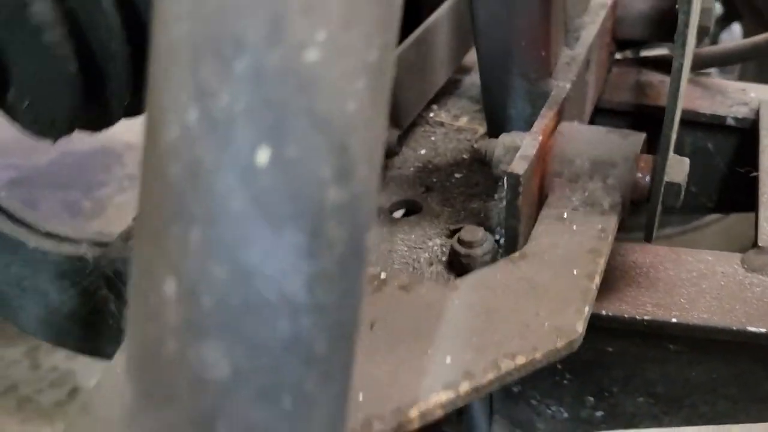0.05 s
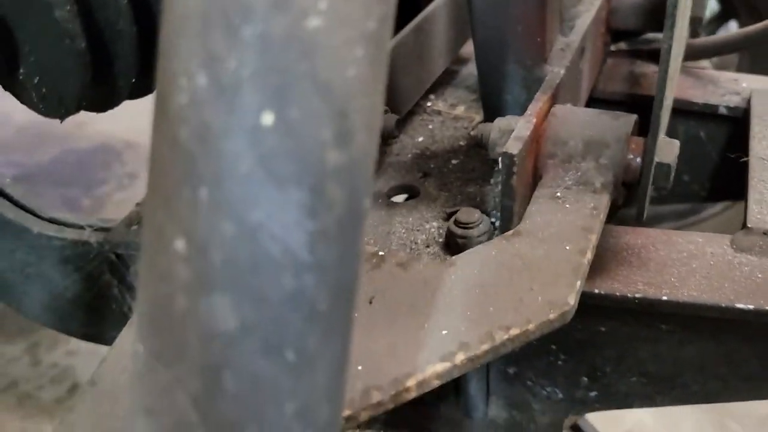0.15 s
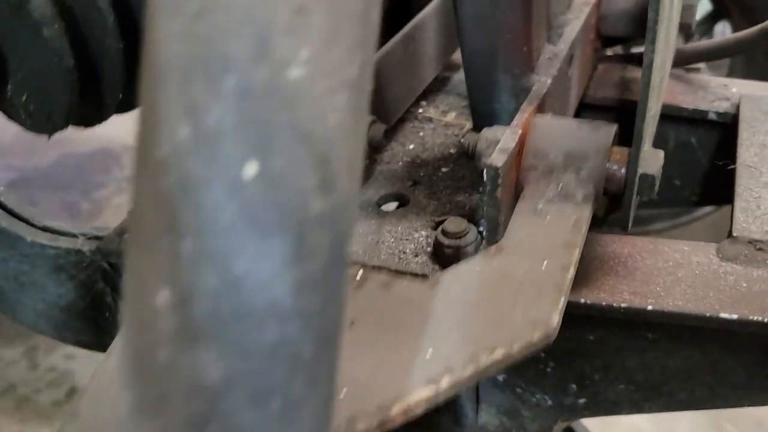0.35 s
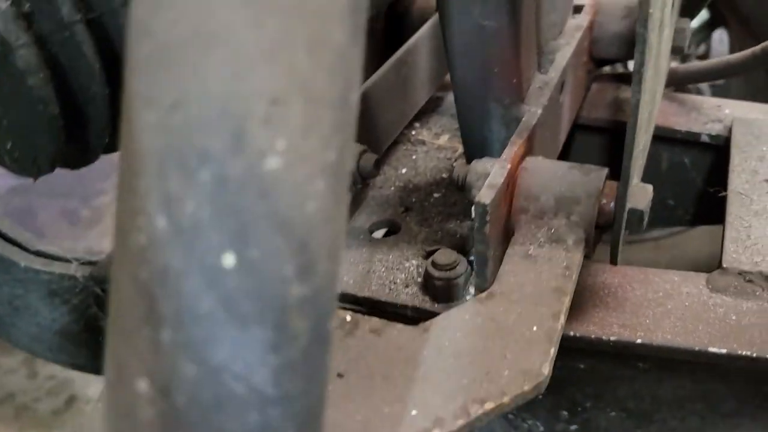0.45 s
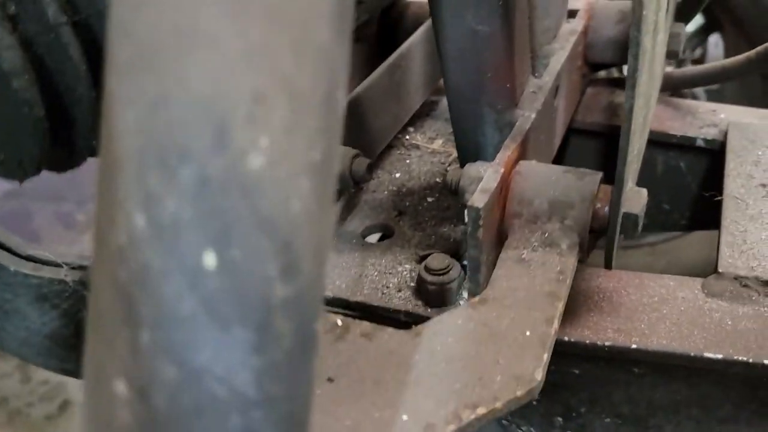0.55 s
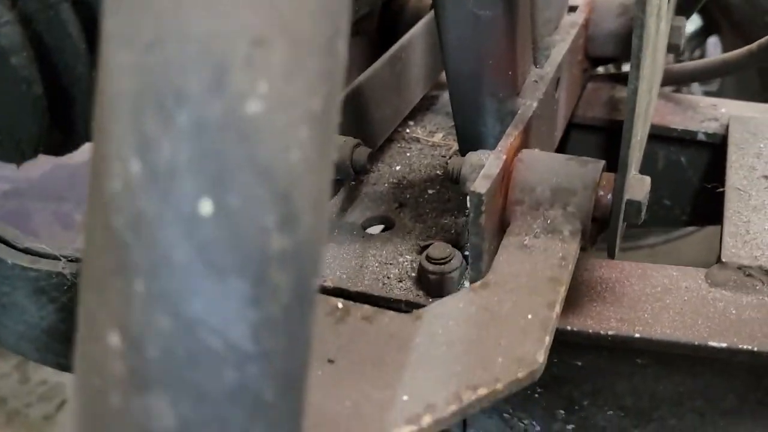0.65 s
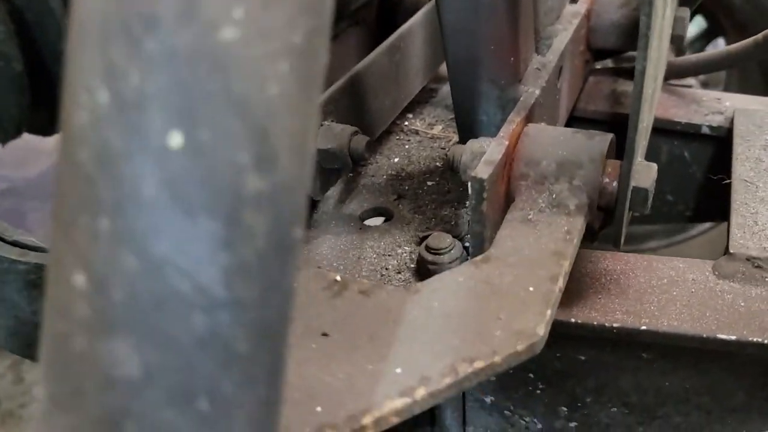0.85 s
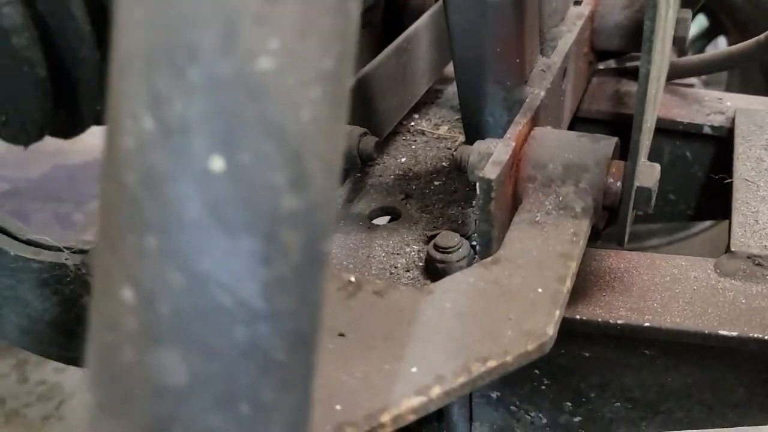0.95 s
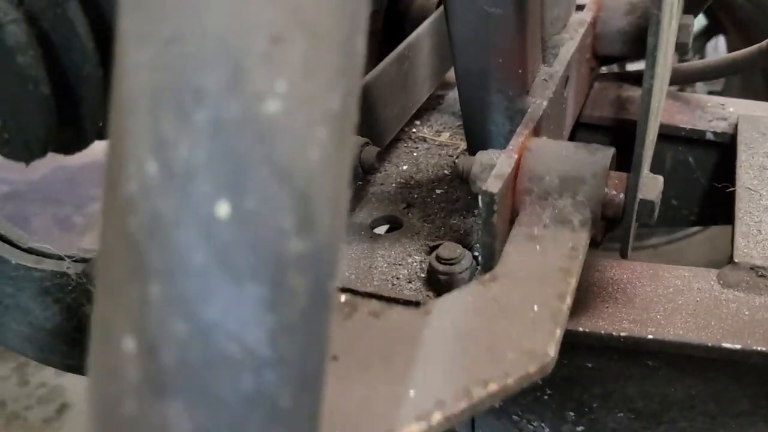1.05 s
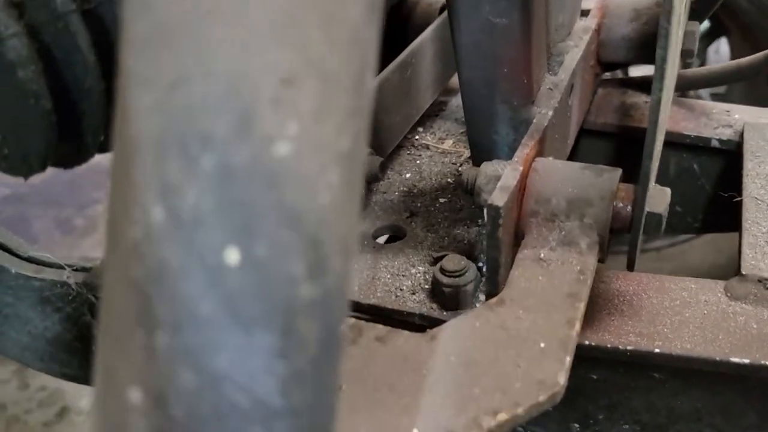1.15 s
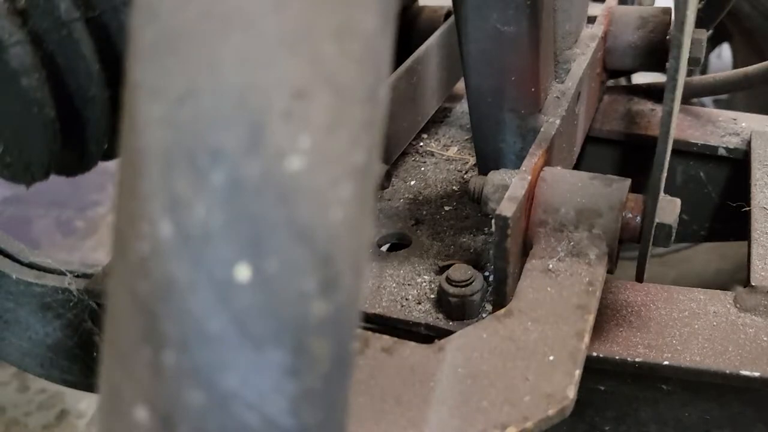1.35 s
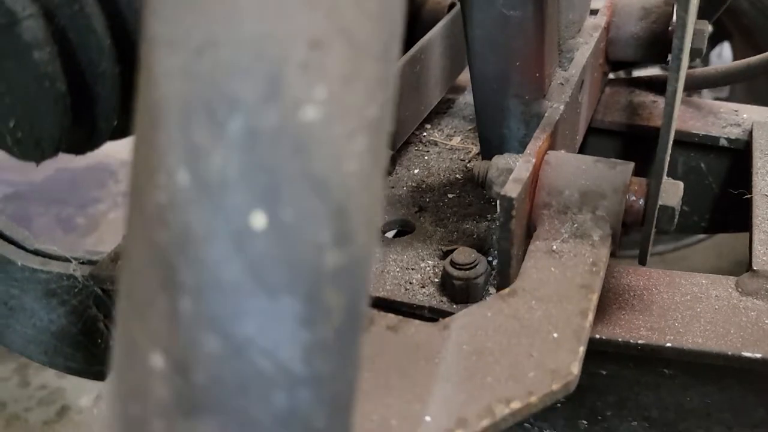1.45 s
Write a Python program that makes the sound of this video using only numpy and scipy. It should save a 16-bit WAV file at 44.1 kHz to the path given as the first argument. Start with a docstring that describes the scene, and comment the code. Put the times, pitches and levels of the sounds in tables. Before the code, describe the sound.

A steel suspension arm knocks in worn mounts, close up in a workshop. Several sharp, briefly ringing clanks come unevenly, each trailed by smaller rattles and dull thuds, with faint gritty scrapes and a low rumble beneath.

```python
"""A steel suspension arm knocks in its worn mounts, rocked by hand, close up in a workshop.
The bolt hits either side of its play, ringing the arm and setting the frame clattering; the arm
thuds into the rubber and chatters to rest. Between knocks the bolt slides with a gritty scrape
and a loose washer taps lightly. The room answers over a low rumble."""
import sys
import numpy as np
from scipy import signal
from scipy.fft import rfft, irfft, next_fast_len
from scipy.io import wavfile
from scipy.ndimage import uniform_filter1d, minimum_filter1d

SR = 44100
rng = np.random.default_rng(int(sys.argv[2]) if len(sys.argv) > 2 else 0)


def digitize_waveform(pressure):
    """Quantize a signal to 16-bit integers and store it at the path in sys.argv[1].

    Rows of a 2-D input are taken as channels; values are limited to [-1, 1].
    """
    field = np.atleast_2d(pressure).T
    bounded = np.clip(field, -1, 1)
    quanta = np.round(bounded * 32767).astype(np.int16)
    wavfile.write(sys.argv[1], SR, quanta)


N = 66150
LEAD_S = 0.1  # pre-roll, so the scene opens on a knock already ringing

# The five EQ points that shape each knock's clatter, in Hz.
CLATTER_HZ = [380, 950, 2100, 4500, 12000]
# The bolt's hits. Each row: start in seconds, contact (0 lift stop, 1 drop stop, 2 bracket edge,
# 3 sleeve), ring level in dB, then clatter gain in dB at each of the five EQ points.
KNOCKS = [(-.05, 1, -18.5, -22.5, -18.5, -16.5, -16, -32.5), (.082, 2, -65, -30, -62, -33, -44, -56),
          (.169, 2, -55, -54, -49, -47, -58, -65), (0.2186, 0, -13, -19, -14.5, -16.5, -13, -30.5),
          (.291, 3, -29.5, -25, -33, -33, -31, -41), (.3085, 2, -16.5, -25, -22, -18.5, -16, -17),
          (.321, 1, -28.5, -21, -22, -22.5, -27, -66), (.366, 3, -19.5, -24, -26, -27, -24.5, -30),
          (0.42, 3, -31.5, -35.5, -31.5, -31.5, -27.5, -85), (.456, 1, -39.5, -34.5, -57, -31, -35, -53),
          (.486, 3, -33, -69, -41, -36, -48, -78), (0.621, 2, -46.5, -42.5, -30.5, -39, -44, -49.5),
          (0.662, 2, -57.5, -53, -59, -65, -49, -55), (0.713, 1, -13.5, -30.5, -16.5, -15.5, -12.5, -31),
          (0.7697, 2, -34, -33.5, -29, -26.5, -24, -29), (.808, 3, -20.5, -29.5, -28, -17, -43, -51),
          (0.9847, 0, -14, -25, -15.5, -19.5, -15, -29.5),
          (1.0947, 1, -25.5, -24.5, -20.5, -25.5, -20.5, -36.5),
          (1.138, 0, -49, -26.5, -28, -48, -62, -42.5), (1.1559, 3, -20, -33, -26.5, -23, -37, -35.5),
          (1.185, 3, -30.5, -47, -34, -23, -32.5, -48), (1.201, 2, -33.5, -29, -48, -38, -31.5, -44),
          (1.248, 2, -54.5, -55, -68, -42.5, -39, -65), (1.273, 2, -64.5, -39.5, -62, -63, -39.5, -58.5)]


def bolt_knocks(out, t):
    """Steel on steel: each hit layers the arm's pitched ring with the frame's noisy clatter."""
    for start, contact, ring_db, *clatter_db in KNOCKS:
        ring = undb(ring_db) * arm_ring(contact, t)
        clatter = colour(frame_clatter(t), CLATTER_HZ, clatter_db)
        add(out, start, ring + clatter)


# The arm's partials. Each row: pitch in Hz, decay to -60 dB in seconds, pan (left minus right) in dB,
# then level in dB when struck at each of the four contacts.
ARM_MODES = [(346.8, 0.17, -4.5, -13.5, -15.5, -10, -12.5), (541.6, 0.14, 3.5, -8.5, -31.5, -6, -23.5),
             (771, 0.17, -6.5, -7.5, -7, -18, -14), (880.4, 0.15, 2.5, -5.5, -6, -27, -10),
             (1122, 0.081, 3, -9, -0.5, -25, -12), (1870, 0.055, -7, -35, -7.5, -14, -2),
             (2018, 0.036, -5.5, -38, 3.5, -15, -1.5), (2726, 0.03, 0.5, -42, -0.5, -14, -9),
             (3450, 0.065, -27, -9, 0.5, -7.5, -41), (3950, 0.12, -23, -3, -12.5, -33, -32.5),
             (4270, 0.081, -9, -3, -27, -29, -26), (4580, .07, -23, -7, -34.5, -31, -36),
             (4984, 0.063, -10.5, -3.5, -23.5, 6.5, -12), (5296, 0.053, -6.5, 6.5, -1, -7.5, -28),
             (6280, 0.1, 27, -3.5, -27, -37, -24), (7300, 0.035, 12, -29, -9, -11.5, -26)]


def arm_ring(contact, t):
    """The contact sets the mix of partials; the arm is lopsided, so each beats with a weaker twin."""
    twin_detune, twin_db = 0.0163, -6.5  # detune as a share of the pitch
    rise_s, spread_rad = 0.00085, 1.564
    ring = 0
    for hz, t60, pan_db, *contact_db in ARM_MODES:
        polarity, lag_sign, detune_sign = rng.choice([-1, 1], size=3)
        lag_rad = lag_sign * spread_rad
        partial = mode(hz, t60, rise_s, lag_rad, t)
        twin = undb(twin_db) * mode(hz * (1 + detune_sign * twin_detune), t60, rise_s, -lag_rad, t)
        ring += polarity * undb(contact_db[int(contact)]) * pan(pan_db) * (partial + twin)
    return ring


# The frame's dense ringing. Each row: band in Hz, gain in dB, decay to -60 dB in seconds, pan in dB.
FRAME_BANDS = [(60, -3, 0.36, -11), (184, 13, 0.11, -1), (370, 16.5, 0.14, 1), (854, 13.5, 0.14, -1),
               (1870, 9, 0.11, -1.5), (3700, 9.5, 0.088, -5), (6700, 7, 0.072, -12),
               (8320, 2.5, 0.037, 11.5), (9400, -4, 0.082, 1), (13620, 9.5, 0.043, -1.5),
               (15800, -13, 0.062, 5)]


def frame_clatter(t):
    """One sharp contact wakes so many frame modes that they blur into a metallic noise burst."""
    hz, db, t60, pan_db = np.array(FRAME_BANDS).T
    return colour(dying_noise(hz, t60, pan_db, t, rise_s=0.0014), hz, db)


# The arm bouncing on its rubber: two slow sways, then three booms.
# Each row: pitch in Hz, decay to -60 dB in seconds, relative level in dB.
RUBBER_MODES = [(64.2, 0.12, -3.5), (95.7, 0.13, -3.5), (178.7, 0.089, -1.5), (257, 0.059, -9),
                (389.5, 0.072, -7)]
# The landings. Each row: start in seconds, sway gain in dB, boom gain in dB.
THUDS = [(.005, -29.5, -34), (0.219, -48, -30), (.316, -38, -14.5), (.34, -22.5, -18), (0.384, -30.5, -39),
         (.414, -19.5, -32.5), (.717, -27.5, -23), (.765, -25, -27), (0.807, -25.5, -47),
         (0.99, -48.5, -40), (1.106, -27, -19.5), (1.135, -21.5, -20), (1.167, -26.5, -24.5),
         (1.221, -22, -30.5)]


def rubber_thuds(out, t):
    """The arm's weight lands in the soft mounts: low partials with a cushioned attack."""
    rise_s, left_lag_s = 0.01, 0.0002
    for start, sway_db, boom_db in THUDS:
        pushes_db = [sway_db] * 2 + [boom_db] * 3
        thud = sum(undb(db + push_db) * mode(hz, t60, rise_s, 2 * np.pi * hz * left_lag_s, t)
                   for (hz, t60, db), push_db in zip(RUBBER_MODES, pushes_db))
        add(out, start, 2 * thud)


# The EQ of the grit. Each row: frequency in Hz, relative gain in dB.
GRIT_EQ = [(200, 3), (800, -12), (2000, 1.5), (5000, -0.5), (9000, -8), (14000, -29.5)]
# The scrapes between knocks. Each row: start in seconds, length in seconds, level in dB.
SLIDES = [(0.038, 0.054, -41), (0.327, 0.056, -28), (0.407, 0.052, -47), (0.791, .06, -39.5),
          (1.123, .11, -63)]


def bolt_slides(out, t):
    """The bolt sticks and slips in its sleeve: a run of tiny contacts rings the frame."""
    slips_per_s, scatter_db = 130, 1.5
    for start, length, db in SLIDES:
        slipping = (rng.random(len(t)) < slips_per_s / SR) & (t < length)
        slips = slipping / undb(scatter_db * rng.standard_normal(len(t)))
        scrape = signal.fftconvolve(frame_clatter(t), slips[None])[:, :len(t)]
        grit = colour(scrape, *np.array(GRIT_EQ).T)
        rms = np.sqrt(np.sum(grit ** 2) / (2 * length * SR) + 1e-12)
        add(out, start, undb(db) * grit / rms)


# The washer's ticks. Each row: start in seconds, pitch in Hz, level in dB.
WASHER_TAPS = [(.456, 5000, -38), (.588, 940, -36), (.622, 5080, -35), (.661, 4600, -42), (.661, 3550, -45)]


def washer_taps(out, t):
    """A loose washer taps lightly, one short partial each time."""
    for start, hz, db in WASHER_TAPS:
        add(out, start, undb(db) * mode(hz, t60=0.04, rise_s=0.002, lag_rad=1.564, t=t))


# The workshop's reverb. Each row: band in Hz, gain in dB, decay to -60 dB in seconds.
ROOM_BANDS = [(58.6, -10, 0.99), (170, -9.5, .65), (370, -0.5, 0.37), (880, -12, 0.61), (2030, -10.5, 0.49),
              (4700, -18, 0.67), (8000, -15, 0.54), (15000, -5.5, 0.27)]


def workshop_reverb(dry):
    """Reflections from around the room merge into a diffuse tail."""
    hz, db, t60 = np.array(ROOM_BANDS).T
    tail = dying_noise(hz, t60, np.zeros(len(hz)), np.arange(SR) / SR, rise_s=0.0044)
    tail /= np.sqrt(np.sum(tail ** 2) / 2)  # unit energy per side
    return signal.fftconvolve(dry, colour(tail, hz, db), axes=1)[:, :dry.shape[1]]


# The EQ of the background bed. Each row: frequency in Hz, relative gain in dB.
RUMBLE_EQ = [(15, -46), (25, -27), (41, -8.5), (64, -5), (166, -18), (229, -33), (489, -22), (677, -43),
             (863, -37.5), (16000, -65.5)]


def rumble():
    """A steady bed of low noise, nearly alike on both sides."""
    level_db, width_db = -43.5, -10.5
    mid, side = colour(rng.standard_normal((2, N)), *np.array(RUMBLE_EQ).T)
    width = undb(width_db) * np.array([side, -side])
    return undb(level_db) * (mid + width) / np.std(mid)


def mode(hz, t60, rise_s, lag_rad, t):
    """One swelling and fading partial, its left channel behind by a phase angle."""
    return np.sin(2 * np.pi * hz * t - np.array([[lag_rad], [0]])) * fade(t60, rise_s, t)


def dying_noise(band_hz, t60s, pans_db, t, rise_s):
    """Countless overlapping modes in stereo, each band fading at its own pace."""
    mono_below_hz = 254  # long waves reach both sides alike
    noise, hz = rfft(rng.standard_normal((3, len(t)))), np.fft.rfftfreq(len(t), 1 / SR)
    mono_share = 1 / (1 + (hz / mono_below_hz) ** 4)
    stereo = np.sqrt(mono_share) * noise[0] + np.sqrt(1 - mono_share) * noise[1:]
    return sum(irfft(stereo * along(hz, band_hz, band), len(t)) * fade(t60, rise_s, t) * pan(pan_db)
               for band, t60, pan_db in zip(np.eye(len(band_hz)), t60s, pans_db))


def fade(t60, rise_s, t):
    """Quick attack, brief hold, exponential decay."""
    hold_s = 0.0012  # a contact buzzes this long before the ring begins to fade
    return (1 - np.exp(-t / rise_s)) * np.exp(-np.log(1000) * np.maximum(t - hold_s, 0) / t60)


def colour(x, points_hz, db):
    """Minimum-phase EQ through the given points, so nothing rings ahead of a hit."""
    n = x.shape[-1]
    size = 2 * next_fast_len(n)
    gain = undb(along(np.fft.rfftfreq(size, 1 / SR), points_hz, db))
    cepstrum = irfft(np.log(gain))
    cepstrum[1:size // 2] *= 2  # fold onto positive time
    cepstrum[size // 2 + 1:] = 0
    return irfft(rfft(x, size) * np.exp(rfft(cepstrum)))[..., :n]


def along(hz, points_hz, values):
    """Read a curve on a log-frequency axis."""
    return np.interp(np.log(np.maximum(hz, 1)), np.log(points_hz), values)


def undb(db):
    """Decibels to gain."""
    return 10 ** (np.asarray(db) / 20)


def pan(db):
    """Constant-power gains, left louder than right by db."""
    gains = undb(np.array([db, -db]) / 2)[:, None]
    return gains / np.sqrt(np.mean(gains ** 2))


def add(out, start, x):
    """Mix a sound in at its time; the track begins LEAD_S early."""
    i = max(int((start + LEAD_S) * SR), 0)
    out[:, i:i + x.shape[-1]] += x[..., :out.shape[1] - i]


def scene():
    """Knocks, thuds, slides and taps share the workshop's reverb, over the rumble."""
    lead = int(LEAD_S * SR)
    t = np.arange(SR // 4) / SR  # each event gets a quarter second to ring out
    out = np.zeros((2, lead + N))
    bolt_knocks(out, t)
    rubber_thuds(out, t)
    bolt_slides(out, t)
    washer_taps(out, t)
    return (out + workshop_reverb(out))[:, lead:] + rumble()


def record(dry):
    """A fast limiter holds down the hardest knocks; a steep low-pass trims the very top."""
    ceiling, limiter_s, top_hz = 0.97, 0.0005, 15900
    span = int(limiter_s * SR)
    gain = ceiling / np.maximum(np.abs(dry).max(axis=0), ceiling)
    smooth_gain = uniform_filter1d(minimum_filter1d(gain, 2 * span + 1), span)
    low_pass = signal.ellip(8, 0.2, 70, top_hz, fs=SR, output="sos")
    return signal.sosfilt(low_pass, dry * smooth_gain)


dry = scene()
out = record(dry)
digitize_waveform(out)
```